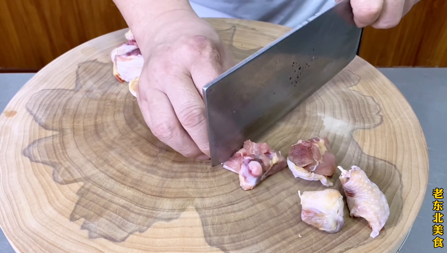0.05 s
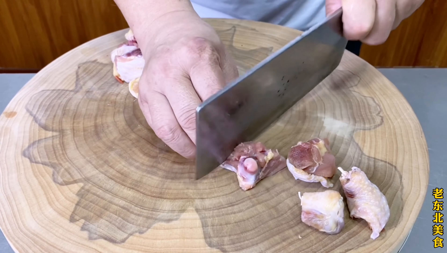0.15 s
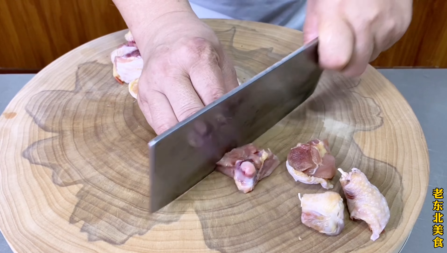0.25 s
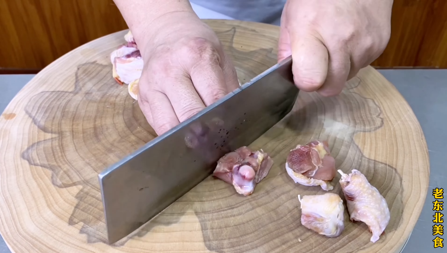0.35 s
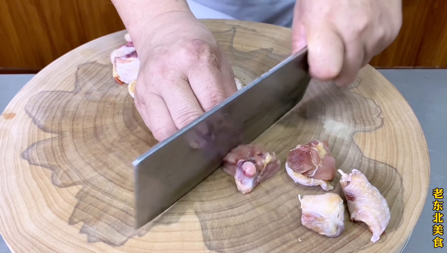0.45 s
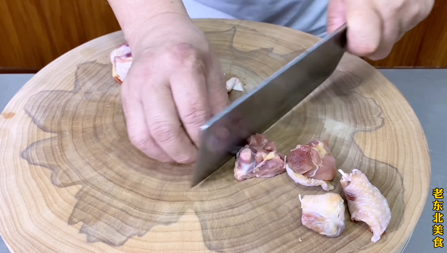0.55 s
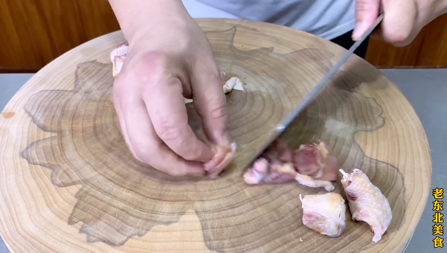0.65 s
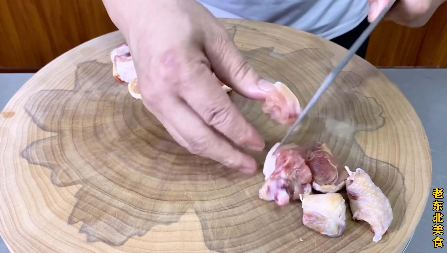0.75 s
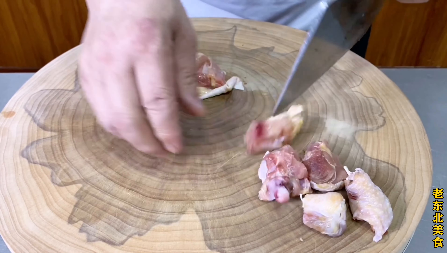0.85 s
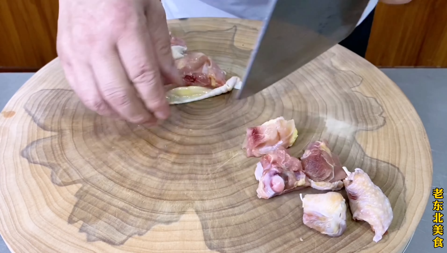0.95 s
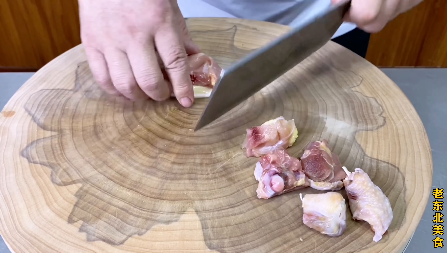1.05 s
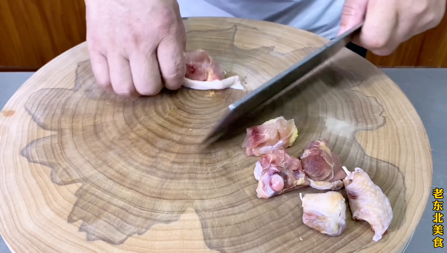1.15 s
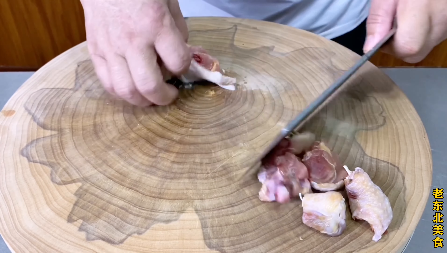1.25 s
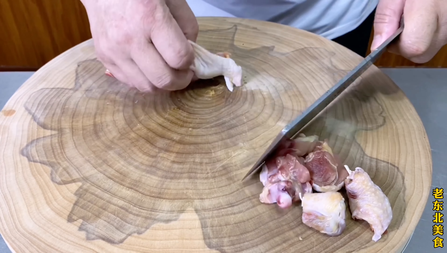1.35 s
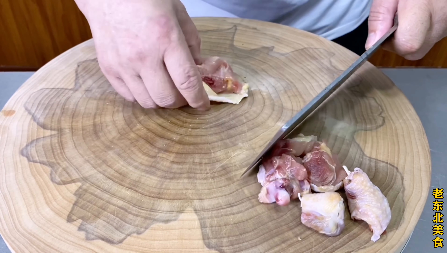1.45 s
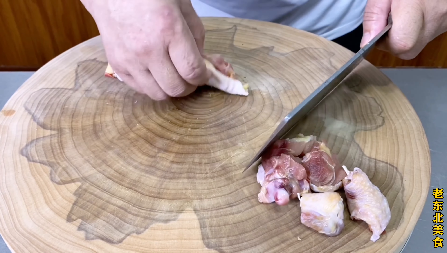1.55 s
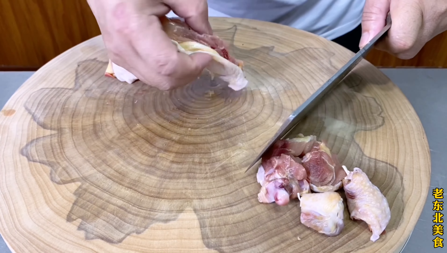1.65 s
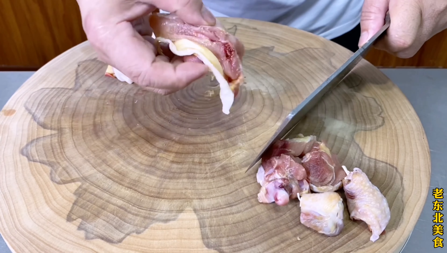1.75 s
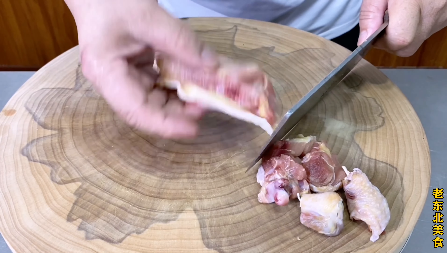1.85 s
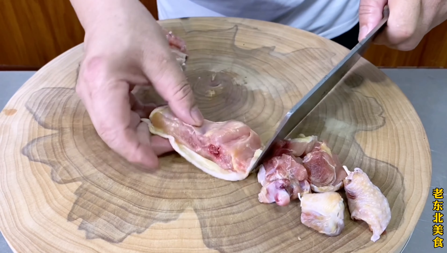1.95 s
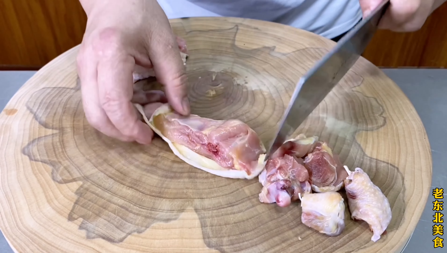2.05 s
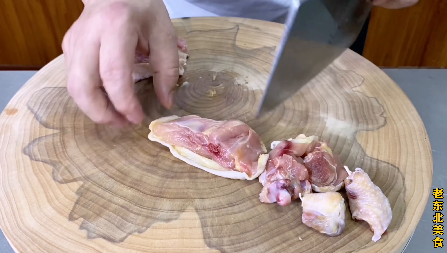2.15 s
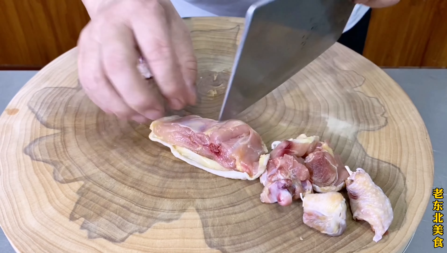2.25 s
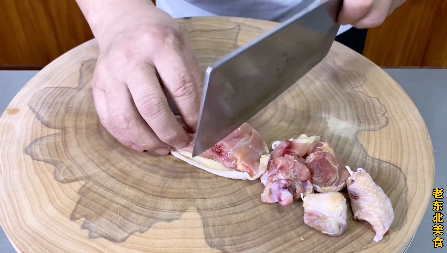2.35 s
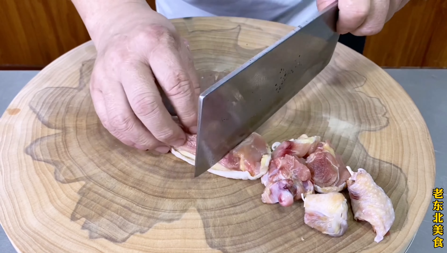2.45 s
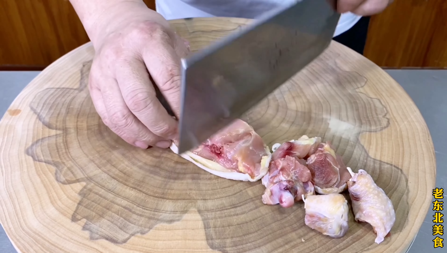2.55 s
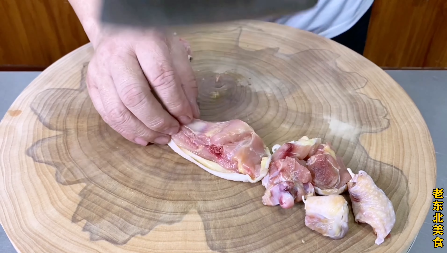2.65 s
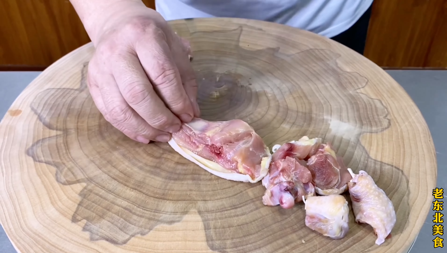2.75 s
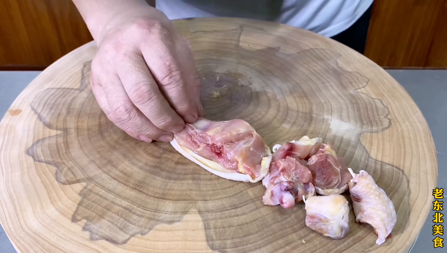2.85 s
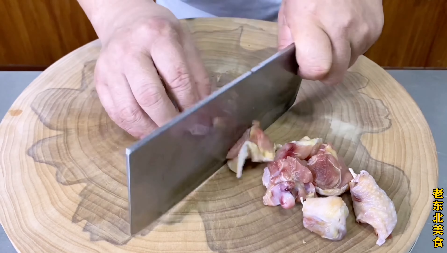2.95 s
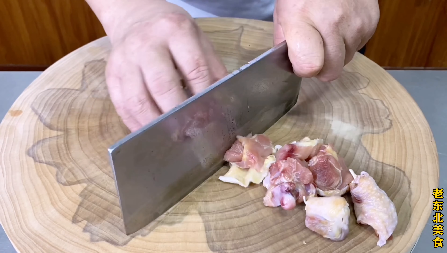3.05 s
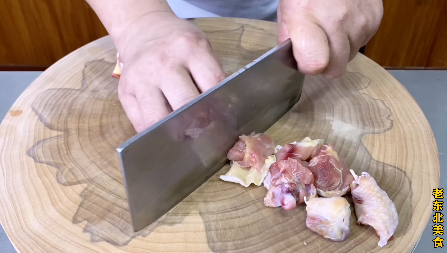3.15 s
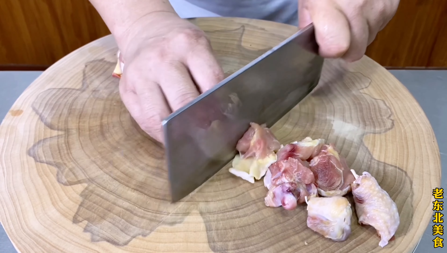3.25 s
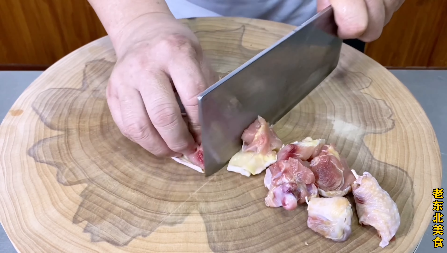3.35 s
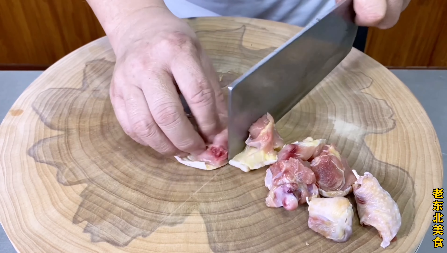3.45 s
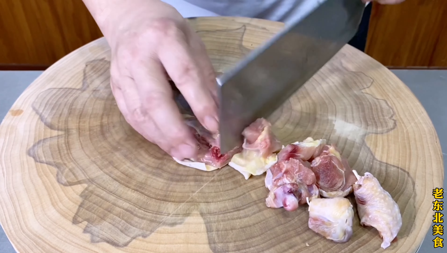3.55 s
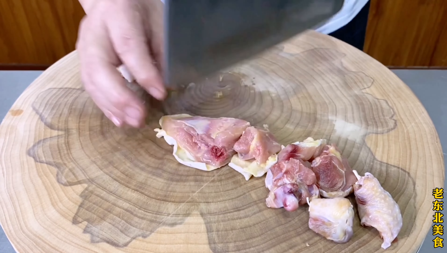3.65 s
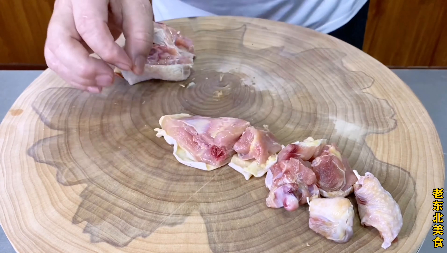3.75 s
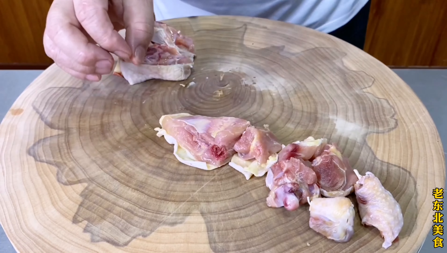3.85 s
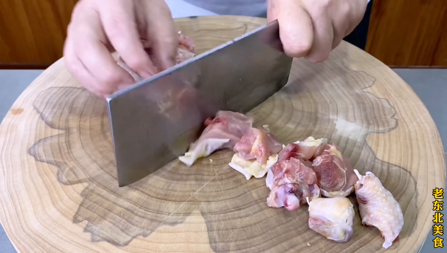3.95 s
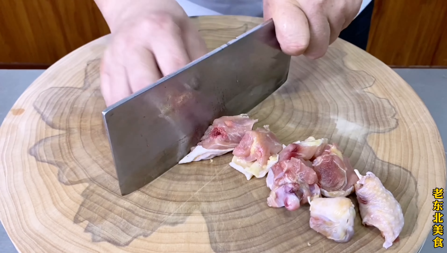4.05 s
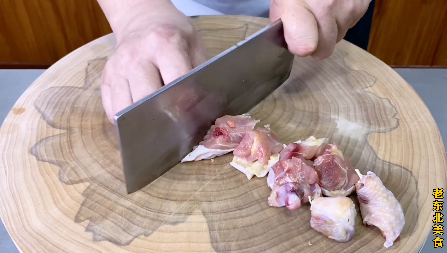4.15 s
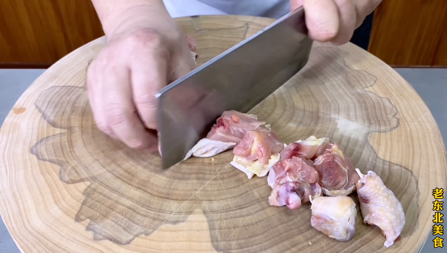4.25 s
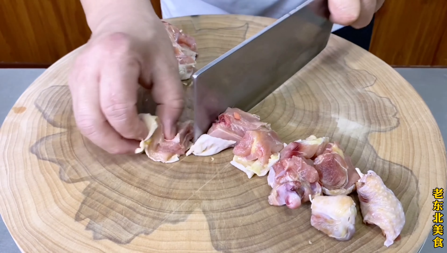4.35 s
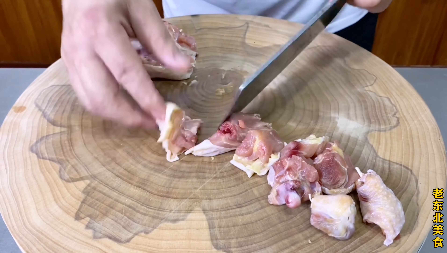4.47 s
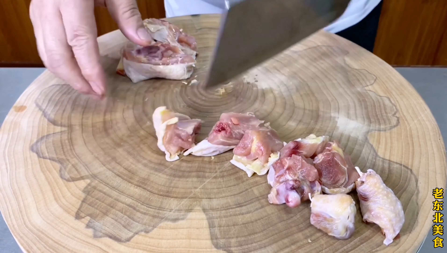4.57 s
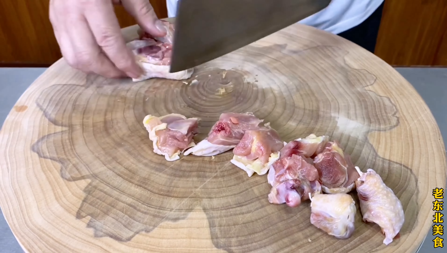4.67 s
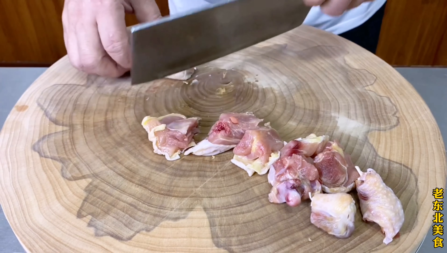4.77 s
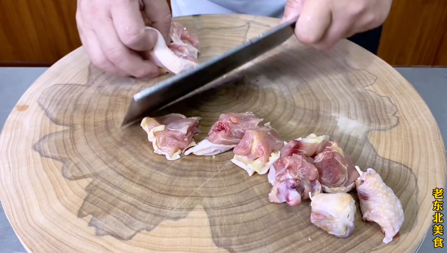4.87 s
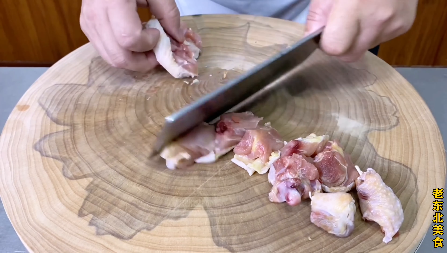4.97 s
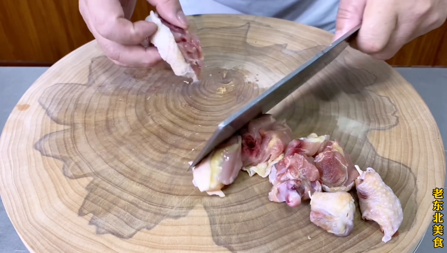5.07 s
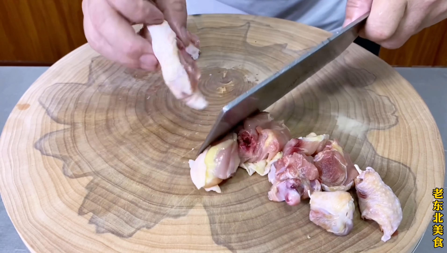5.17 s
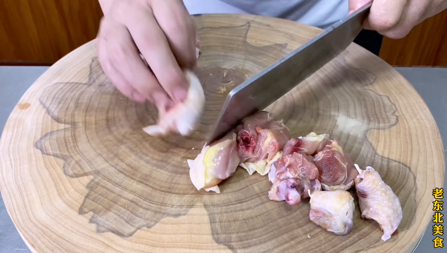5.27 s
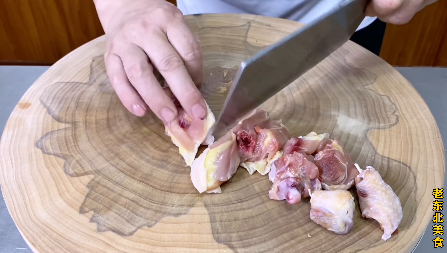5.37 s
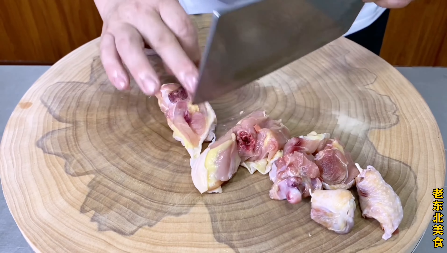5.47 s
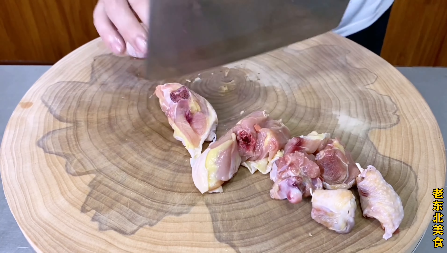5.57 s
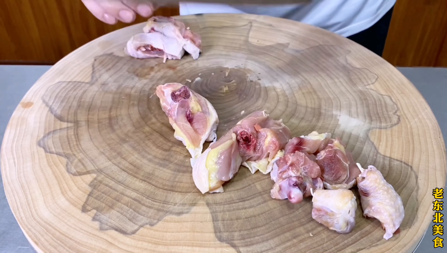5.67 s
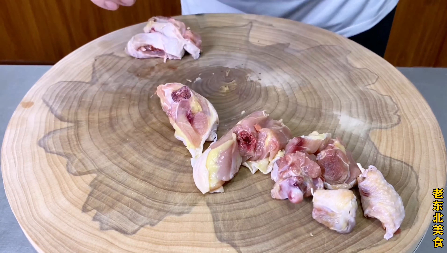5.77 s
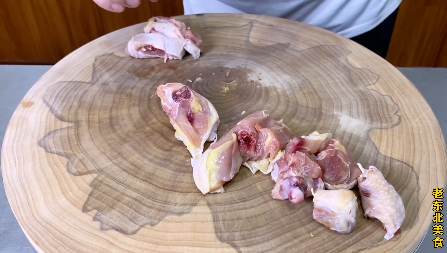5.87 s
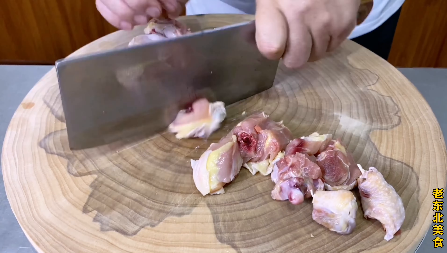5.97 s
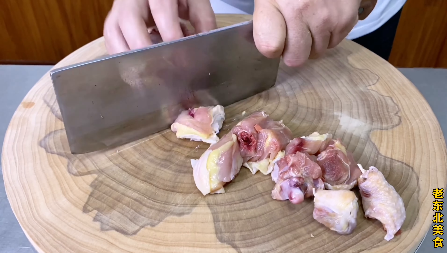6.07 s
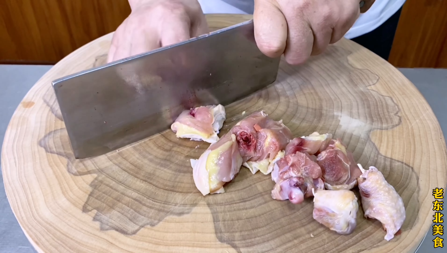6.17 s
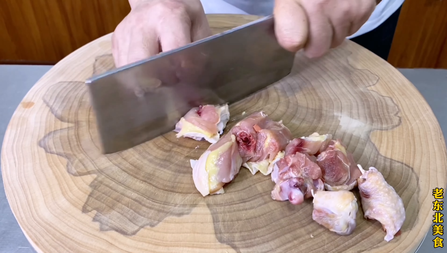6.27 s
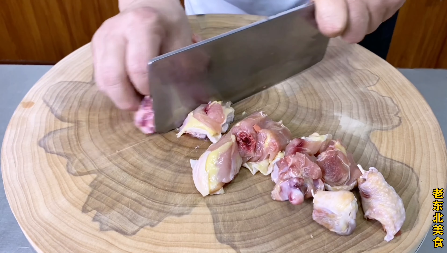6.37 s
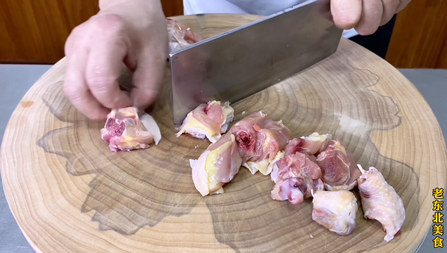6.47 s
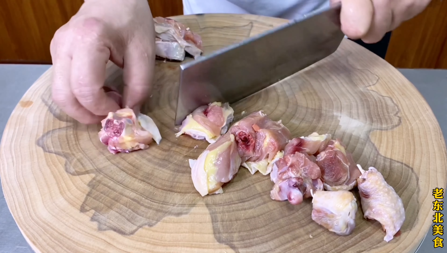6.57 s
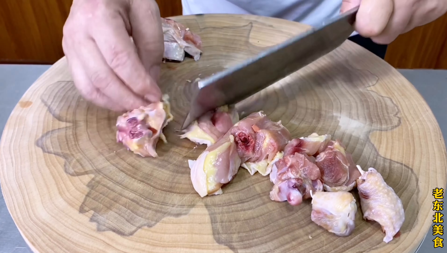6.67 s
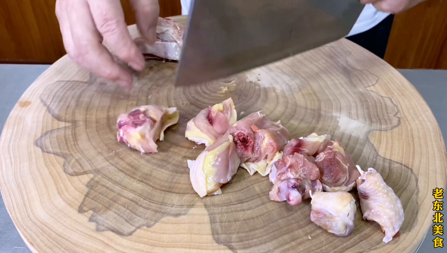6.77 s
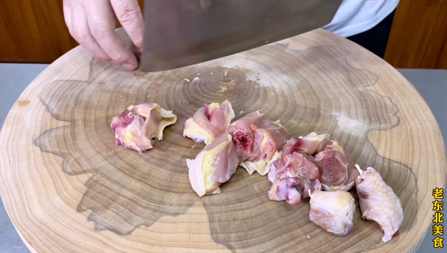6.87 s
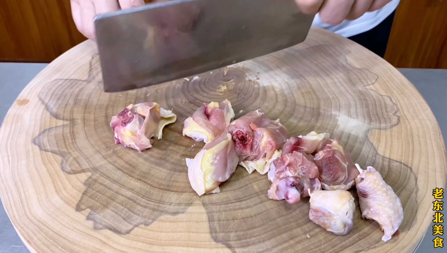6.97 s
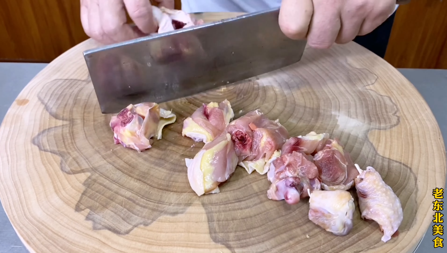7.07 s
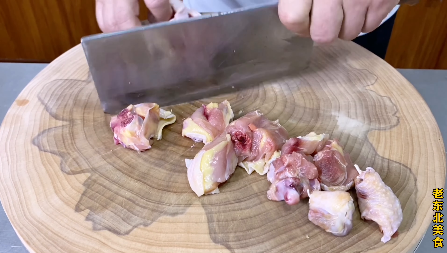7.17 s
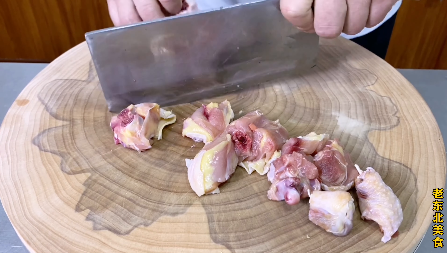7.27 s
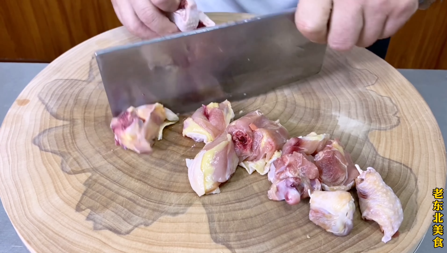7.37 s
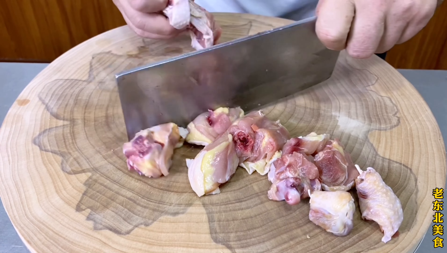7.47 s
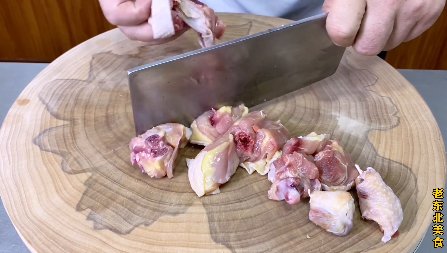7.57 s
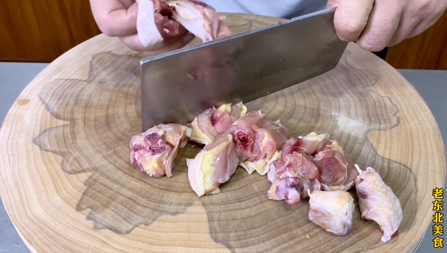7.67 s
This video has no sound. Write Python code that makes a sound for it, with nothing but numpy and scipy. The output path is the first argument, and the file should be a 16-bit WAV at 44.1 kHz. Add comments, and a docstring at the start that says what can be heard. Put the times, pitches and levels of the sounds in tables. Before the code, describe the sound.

Close stereo phone pickup in a hard-walled kitchen, with faint, deep fan air and hum throughout. In the first 0.8 s the cleaver edge scrapes wood and wet meat, with a dull knock near 0.4 and small steel squeaks. At 1.2 a light chop clacks and the blade sings briefly. Soft ticks, moist smacks and barely audible thin whistles follow, with a short scrape at 2.0. At 3.0 a very loud blow cracks bone and thuds into the block, followed by gritty dragging around 3.3. Another heavy, crunchier chop lands at 4.0, with smacks just after. Around 5.0 a weak knock leads into a bright, squeaky steel scrape, with a small tick at 5.4. The third hard crack comes at 6.1, ringing off the walls. A raspy scrape follows at 6.7, a light tap at 7.15, then squeaky drags until about 7.5.

```python
"""A heavy cleaver chops chicken on a thick wooden block, heard close by a phone with two microphone ports.
Each blow is a click and a burst of noise that cracks through bone, rings the block's damped modes and thuds.
Between blows the blade scrapes the wood as uneven noise, part of it ringing the steel, and squeaks in short tones;
small smacks and ticks are noise bursts, and wet meat pops in short damped tones.
A hard-walled kitchen echoes it with decaying noise over a fan's air noise and hum; thin whistles come and go."""
import sys
import numpy as np
from scipy import signal
from scipy.fft import rfft, irfft, next_fast_len
from scipy.io import wavfile
from scipy.ndimage import uniform_filter1d

SR = 44100
rng = np.random.default_rng(int(sys.argv[2]) if len(sys.argv) > 2 else 0)


def put_to_file(sound):
    """Save the sound as 16-bit audio at rate SR, in the file named by the first command-line argument."""
    columns = np.atleast_2d(sound).T  # one column per channel
    safe = np.clip(columns, -1, 1)
    whole_steps = np.round(safe * 32767)
    wavfile.write(sys.argv[1], SR, whole_steps.astype(np.int16))


N = 340452  # length of the scene in samples

# short modes of the wooden block, fed by crack and splinters: (pitch_hz, level_db, t60_s)
BLOCK_MODES = [(338, -17, 0.017), (640, -13, 0.017), (753, -3.5, 0.027), (946, 0.5, 0.011),
               (1100, -6, 0.013), (1430, 6.5, 0.012), (2110, -9.5, 0.034), (2540, -0.5, 0.008),
               (3900, -13, 0.0055)]
# colour of the bare crack: (frequency_hz, level_db)
SNAP_CURVE = [(250, -10), (380, -28), (700, 0), (1400, 9), (2500, 2.5), (3500, -3.5), (4800, -7),
              (6500, -9.5), (9000, -16), (15000, -22.5)]


def undb(db):
    """Gain of a dB value."""
    return 10 ** (np.asarray(db) / 20)


def unit(x):
    """Scale to rms 1."""
    return x / np.sqrt(np.mean(x ** 2))


def ring(x, hz, t60):
    """One mode: a two-pole resonator turns each impulse into a damped sine."""
    pole = np.exp(2j * np.pi * hz / SR - np.log(1000) / (max(t60, .002) * SR))
    return signal.lfilter([0, pole.imag], [1, -2 * pole.real, abs(pole) ** 2], x)


def modes(x, table, length=1.0, tilt_db=0.0, shift=0.0):
    """A body as a sum of modes; each call may shift them at random, damp them or tilt them per octave."""
    out = 0
    for hz, db, t60 in table:
        pitch_hz = hz * (1 + shift * rng.standard_normal())
        out = out + undb(db + tilt_db * np.log2(hz / 1000)) * ring(x, pitch_hz, length * t60)
    return out


def colour(x, db_at):
    """Weigh the spectrum by a function Hz -> dB, leaving the phase alone."""
    n = next_fast_len(x.shape[-1])
    hz = np.arange(1, n // 2 + 2) * SR / n
    return irfft(rfft(x, n) * undb(db_at(hz)), n)[..., :x.shape[-1]]


def ports(x, pan_db):
    """The two ports hear one sound a moment apart; the phone's body shades all but the bass."""
    port_lag_ms = -.17  # the left port is nearer the block
    n = next_fast_len(x.shape[-1])
    hz = np.arange(n // 2 + 1) * SR / n
    shade = undb(pan_db / 2 / (1 + (300 / (hz + 1)) ** 2))
    left = np.exp(-1j * np.pi * hz * port_lag_ms / 1000) * shade
    return irfft(rfft(x, n) * np.array([left, 1 / left]), n)[:, :x.shape[-1]]


def wide_noise(n):
    """Noise that is alike left and right in the bass and unrelated in the treble."""
    alike_hz = 566  # the side signal fades below this
    mid, side = rng.standard_normal((2, n))
    side = colour(side, lambda hz: -10 * np.log10(1 + (alike_hz / hz) ** 2))
    return np.array([mid + side, mid - side]) / np.sqrt(2)


def walk(rate):
    """Wandering control signal: random levels held 1 / rate s and slewed twice."""
    k = int(SR / rate)
    steps = np.repeat(rng.standard_normal(N // k + 1), k)
    return 1.45 * uniform_filter1d(uniform_filter1d(steps, k), k)[:N]


def add(out, s, x):
    """Mix x into out from second s on."""
    i = max(int(s * SR), 0)
    out[:, i:i + x.shape[1]] += x[:, :N - i]


def fan():
    """Fan: deep, steady air noise, with two wavering tones made of narrow resonant noise."""
    # air noise spectrum: (frequency_hz, level_db per Hz)
    air_curve = [(15, -68), (25, 0.5), (49, -9.5), (70, -12), (87, -6), (108, -2), (134, -11), (212, -11.5),
                 (301, -19.5), (1290, -32), (2110, -38), (2910, -39.5), (7110, -52.5), (10400, -69),
                 (16000, -56.5)]
    # wavering tones: (pitch_hz, width_hz, level_db)
    hum_tones = [(107.2, 2.4, -44.5), (208.6, 31, -47.5)]
    air_db, pan_db = -41.2, -1.5
    knots_hz, curve_db = np.transpose(air_curve)
    air = colour(wide_noise(N), lambda hz: np.interp(np.log(hz), np.log(knots_hz), curve_db))
    out = unit(air) * undb(air_db + 0.095 * walk(1.2))
    for hz, width_hz, db in hum_tones:
        t60 = np.log(1000) / np.pi / width_hz
        out = out + undb(db) * unit(ring(wide_noise(N), hz, t60))
    return out * undb(np.array([[pan_db], [-pan_db]]) / 2)


def whistles():
    """Faint thin tones: noise through a narrow resonance wavers under a soft swell."""
    # (start_s, end_s, pitch_hz, level_db before the swell)
    whistle_times = [(1.487, 1.772, 6190, -64), (1.624, 1.977, 1614, -59.5), (1.689, 1.753, 1060, -49)]
    out = np.zeros((2, N))
    for start, end, hz, db in whistle_times:
        t = np.arange(int((end - start) * SR)) / SR
        tone = unit(ring(rng.standard_normal((2, len(t))), hz, 0.27))
        add(out, start, undb(db) * tone * np.sin(np.pi * t / t[-1]))
    return out


def kitchen(dry):
    """Hard walls: dense, lumpy echoes as noise that dies away band by band, after a short gap."""
    # (centre_hz, t60_s, level_db)
    echo_bands = [(60.4, 1.8, -14.5), (111, 0.75, -34), (175, 0.77, -4.5), (303, 0.68, -4.5),
                  (488, 0.96, 1), (900, 0.22, -9.5), (2030, 0.72, -15.5), (4150, 0.45, -9.5),
                  (7340, 0.66, -26.5), (14600, 0.32, -13.5)]
    gap_s, rise_s = 0.0043, 0.0025
    t = np.arange(int(1.2 * SR)) / SR
    noise, tail = wide_noise(len(t)), 0
    for centre_hz, t60, db in echo_bands:
        band = colour(noise, lambda hz: -12 * np.log2(hz / centre_hz) ** 2)
        lumps_db = 2.8 * walk(45.4)[:len(t)]
        # longer bands are scaled down to balance their energy
        tail = tail + band * undb(db + lumps_db - 60 * t / t60) / np.sqrt(t60 * SR / 14)
    tail = tail * np.clip((t - gap_s) / rise_s, 0, 1)
    return signal.fftconvolve(dry, tail)[:, :N]


def ticks():
    """Each small smack, knock or tick is a short burst of noise, broad around its own centre."""
    # small smacks, knocks and ticks, some of them part of a blow or its rebound:
    # (time_s, level_db before colouring, centre_hz, left_minus_right_db)
    small_hits = [(0.05, -57, 3830, -10), (0.393, -28, 7750, 9), (.398, -31, 3800, -2),
                  (.404, -26, 6700, -4), (0.43, -33, 2500, -8), (.434, -16, 900, 0), (0.727, -38, 6000, 0),
                  (0.961, -41, 3290, 4), (1.178, -24, 4500, -5), (1.631, -40.5, 6500, 2),
                  (1.67, -33, 2380, -2), (1.968, -48, 5200, 0), (2.005, -45, 7000, -4),
                  (2.011, -29, 3940, 2), (2.111, -39, 2700, 1), (2.455, -53, 4600, 0),
                  (2.4975, -43, 2220, 1), (2.512, -48, 6100, 4), (2.57, -40.5, 2450, 3),
                  (2.85, -36, 3510, 6), (3.075, -27, 4500, 2), (3.141, -27, 2330, -2),
                  (3.301, -30, 8000, 6), (3.497, -41, 5500, 7), (3.608, -45, 7800, 0),
                  (4.112, -20, 2500, -1), (4.179, -23.5, 2110, 3), (4.217, -29, 2030, -11),
                  (5.133, -35, 4190, -3), (5.165, -34.5, 4150, 3), (5.179, -46, 4100, -4),
                  (5.411, -32.5, 5100, 4), (6.153, -24, 2540, -8), (6.359, -41, 3860, 9),
                  (6.73, -27, 2000, -1), (7.089, -24, 4000, 7), (7.151, -32, 4800, 3),
                  (7.272, -26, 2500, 2)]
    rise_ms, fade_ms = 0.3, 3.4  # time constants
    out, t = np.zeros((2, N)), np.arange(SR // 20) / SR
    for s, db, centre_hz, pan_db in small_hits:
        slope_s = np.where(t < .002, rise_ms / 1000, fade_ms / 1000)
        burst = rng.standard_normal(len(t)) * np.exp(-np.abs(t - .002) / slope_s)
        burst = colour(burst, lambda hz: -7.0 * np.abs(np.log2(hz / centre_hz)))
        add(out, s - .002, ports(undb(db) * burst, pan_db))
    return out


def rasps():
    """The edge judders over bone and grain: gritty noise in one broad resonance, quick start, uneven fade."""
    # (start_s, length_ms as the fade's time scale, level_db before the fade, centre_hz, width_hz)
    judders = [(2.016, 27, -46, 2700, 300), (3.245, 160, -46, 5350, 800), (5.015, 40, -30, 4200, 400),
               (6.726, 44, -44, 2100, 303), (6.727, 82, -41, 3300, 249), (6.729, 99, -37.5, 4400, 600),
               (6.733, 97, -42.5, 6530, 453), (6.73, 90, -46, 5430, 500), (7.081, 60, -38.5, 3850, 1100)]
    out = np.zeros((2, N))
    for s, ms, db, hz, width_hz in judders:
        u = np.linspace(0, 2, int(2 * ms / 1000 * SR))  # time in lengths
        grit = rng.standard_normal((2, len(u))) * undb(2.1 * walk(150)[:len(u)])
        # a shared part and a part of each port's own
        band = unit(colour(grit[0] + 1.8 * grit, lambda f: -12 * ((f - hz) / width_hz) ** 2))
        envelope = np.minimum(u / 0.076, 1) * np.exp(-1.6 * u ** 2)
        add(out, s, ports(undb(db) * band * envelope, -0.5))
    return out


def squeaks():
    """The edge catches and the blade sings: short tones swell fast and die; the higher, the rougher."""
    # pressure on the edge shifts the pitch of the mode that sings
    # (start_s, length_ms as the swell's time scale, level_db before the swell, pitch_hz)
    catches = [(.04, 19, -38, 1430), (.365, 18, -39, 5540), (.368, 16, -43, 4230), (0.409, 13, -23.5, 1430),
               (0.505, 17, -31, 1430), (.511, 38, -34, 4585), (.54, 54, -39, 6040), (.575, 65, -34.5, 7920),
               (.648, 18, -39, 6000), (.655, 36, -38, 1990), (.67, 50, -42, 4670), (0.714, 54, -38, 4190),
               (0.716, 33, -31, 1430), (.722, 22, -20.5, 2700), (.762, 35, -39, 3830),
               (.77, 46, -49.5, 5850), (1.232, 65, -25, 3830), (1.233, 48, -31, 5850),
               (1.234, 48, -29, 6700), (1.242, 13, -17, 1430), (1.255, 30, -28, 4290),
               (1.27, 63, -32.5, 4745), (1.258, 68, -25, 1990), (2.01, 3.5, -15, 4060),
               (2.02, 33, -45, 4190), (3.005, 45, -28, 5200), (3.44, 50, -36.5, 2150),
               (4.957, 54, -14.5, 1990), (4.958, 58, -23, 1430), (4.97, 40, -36, 3290),
               (4.965, 75, -30, 3830), (5.002, 23, -15, 3650), (5.001, 23, -26, 7200),
               (5.005, 12, -23, 5220), (5.004, 56, -32, 6370), (5.01, 40, -19, 4190),
               (5.024, 21, -18, 1430), (5.031, 48, -27, 2666), (5.031, 35, -20, 3300),
               (5.051, 23, -23, 1990), (6.738, 28, -25, 4300), (6.733, 20, -30, 3250),
               (7.266, 41, -23.5, 3830), (7.271, 30, -25.5, 1430), (7.275, 54, -28, 1990),
               (7.415, 45, -35.5, 1430), (7.428, 39, -32, 3830), (7.456, 28, -27, 3830),
               (7.452, 35, -18, 1430), (7.496, 18, -29, 1400), (7.51, 43, -31.5, 1350),
               (7.506, 29, -34, 3780), (7.47, 60, -41, 4250), (7.46, 29, -32, 1990), (7.472, 20, -20, 2700)]
    rough_hz = 8600  # a mode this high is half tone, half rasp
    out = np.zeros((2, N))
    for s, ms, db, hz in catches:
        u = np.linspace(0, 1.5, int(1.5 * ms / 1000 * SR))  # time in lengths
        tone = np.sqrt(2) * np.sin(2 * np.pi * (hz * u * ms / 1000 + rng.random()))
        rough = unit(ring(rng.standard_normal(len(u)), hz, 120 / hz))
        swell = u * np.exp(-2.8 * u ** 2)
        add(out, s, ports(undb(db) * (tone + hz / rough_hz * rough) * swell, -0.85))
    return out


def drags():
    """Pressure of the edge as swell, hold and fade; where drags overlap the stronger one sets the colour."""
    # one drag over wood and meat; swell and fade are the times for 20 dB:
    # (loudest_s, rub_db, swell_ms, hold_ms, fade_ms, blade_share_db, tilt_db per octave)
    strokes = [(.055, -53.5, 37, 4.7, 22, -7, -5), (.34, -52.5, 270, 23, 74, 1, 5.5),
               (.385, -39, 44, 17, 160, -4, -3.5), (.518, -39.5, 34, 13, 220, -4.5, 2.5),
               (.6, -49, 100, 78, 64, -15, 4), (0.725, -40, 74, 13, 42, 0.5, 0),
               (1.238, -33, 15, 41, 33, 0, 0.5), (1.311, -49, 35, 5, 130, -23, 3.5),
               (1.54, -62, 40, 160, 97, -19, -1), (2.009, -43, 16, 2.8, 47, -9, -2.5),
               (3.328, -42.5, 320, 4.2, 180, -3.5, 3.5), (3.4, -52, 87, 96, 135, 4, 5),
               (4.328, -47, 440, 73, 210, -1, 5), (5.018, -32, 53, 7, 48, 0, 2),
               (5.09, -56.5, 40, 30, 170, -9, 5.5), (5.413, -48, 16, 4.5, 44, 2, 1),
               (5.55, -55.5, 150, 71, 230, -9, -5), (6.432, -41, 270, 43, 102, -0.5, 2.5),
               (6.732, -33.5, 11, 6.9, 110, -8, 0), (7.086, -42.5, 19, 61, 82, -7, 3.5),
               (7.274, -42, 55, 10, 180, -6, -3), (7.466, -41, 68, 62, 45, -1, 1.5)]
    t = np.arange(N) / SR
    power, share_db, tilt_db = np.full((3, N), 1e-18)
    for s, db, swell_ms, hold_ms, fade_ms, own_share_db, own_tilt_db in strokes:
        ms = 1000 * (t - s)
        slopes = np.maximum(-ms / swell_ms, np.maximum(ms - hold_ms, 0) / fade_ms)
        own = undb(2 * (db - 20 * slopes))  # doubled dB gives power
        power = power + own
        share_db = share_db + own * own_share_db
        tilt_db = tilt_db + own * own_tilt_db
    return np.sqrt(power), share_db / power, tilt_db / power


def wet(gain):
    """Pockets of juice pop under the edge, each a short damped sine on a fixed pitch of its own."""
    pops_per_s, low_hz, high_hz = 770, 1300, 7570
    faintest_db, spread_db = -10.5, 12  # against the rub; from the faintest pop to the loudest
    out, k = np.zeros((2, N + 1024)), np.arange(1024)
    when, pitch, size, length, side = rng.random((7000, 5))[:int(pops_per_s * N / SR)].T
    at = (when * N).astype(int)
    hz = low_hz * (high_hz / low_hz) ** pitch
    cycles = hz[:, None] * k / SR
    fade_cycles = 17.3 * (0.18 + length[:, None]) / 3  # time constant
    pops = np.sin(2 * np.pi * cycles) * np.exp(-cycles / fade_cycles) * (1 - k / 1024)
    pops = pops * (gain[at] * undb(faintest_db + spread_db * size ** 2))[:, None]
    for ear, share in zip(out, (np.cos(side * np.pi / 2), np.sin(side * np.pi / 2))):
        np.add.at(ear, at[:, None] + k, pops * (0.14 + share[:, None]))
    return out[:, :N]


def scrapes():
    """Uneven stick and slip: a gritty rub, part of it ringing the blade's modes, each mode fed on and off."""
    # colour of the rub: (centre_hz, level_db)
    rub_bands = [(1000, -1), (1500, -25), (2200, -2.5), (3100, -2.5), (4300, -3.5), (5800, -7.5),
                 (7600, -9), (10500, -8), (14000, -15)]
    # modes of the blade: (pitch_hz, width_hz, level_db relative to each other)
    blade_modes = [(1430, 80, 7.5), (1990, 30, -0.5), (2700, 30, -9), (3290, 23, -5), (3670, 88, -20),
                   (3830, 11, -26), (4190, 38, -11), (4585, 120, 6), (5220, 90, -13), (6400, 19, -18),
                   (5850, 50, -20), (7270, 60, -0.5), (7700, 89, 5.5), (7920, 97, 0)]
    gain, share_db, tilt_db = drags()
    grit = gain * unit(undb(1.26 * walk(60) + 1.8 * walk(500)))
    rub = grit * rng.standard_normal(N)
    # the edge is long, so each port also hears a part of its own
    own = colour(rng.standard_normal((2, N)), lambda hz: -10 * np.log10(1 + (hz / 6500) ** 4))
    wide = ports(rub, -0.35) + 1.14 * grit * own
    hiss = 0
    # wet meat and wood grain: narrow parts of the rub flare up one by one
    for centre_hz, db in rub_bands:
        flicker = undb(db + tilt_db * np.log2(centre_hz / 4500) + 4.0 * walk(45))
        hiss = hiss + flicker * colour(wide, lambda hz: -50 * np.log2(hz / centre_hz) ** 2)
    steel = 0
    for hz, width_hz, db in blade_modes:
        fed = rub * undb(share_db + 3.3 * walk(40))
        steel = steel + undb(db - 32) * ring(fed, hz, np.log(1000) / np.pi / width_hz)
    return hiss + ports(steel, -1.2) + wet(gain)


def snap_db_at(hz):
    """Level of the bare crack at each frequency, in dB."""
    knots_hz, db = np.transpose(SNAP_CURVE)
    return np.interp(np.log(hz), np.log(knots_hz), db)


def bone_crack(t, ms, tilt_db):
    """A burst of noise: a brief treble-only rise, a sharp click 10 ms in, then a fast fade."""
    rise_hz = 2500  # the rise before the click lies above this
    x = (t - .01) / (ms / 1000)
    shared, own = rng.standard_normal(len(t)), wide_noise(len(t))
    # each port hears the long cut from its own side
    burst = (0.18 * shared + 0.42 * own) * np.exp(np.where(x < 0, 2.0 * x, -1.3 * x))
    rise = colour(burst * (x < 0), lambda hz: -10 * np.log10(1 + (rise_hz / hz) ** 4))
    crack = burst * (x >= 0) + 1.37 * rise
    crack[:, int(.01 * SR)] += 3.5  # the click
    return colour(crack, lambda hz: tilt_db * np.log2(hz / 1500))


def bone_splinters(since):
    """Splinters of bone and fibre keep snapping after the click: sparse random impulses that fade."""
    fade_ms, per_s = 30.6, 1100  # time constant; average count in each port
    shape = (2, len(since))
    snaps = (rng.random(shape) < per_s / SR) * rng.standard_normal(shape)
    return snaps * (since > 0) * np.exp(-1000 * since / fade_ms)


def crunch_of(splinters, mode_shift):
    """Splinters heard directly, broad around 1 kHz, and knocking on the block's modes."""
    bare = colour(splinters[0] + 0.58 * splinters, lambda hz: -3.5 * np.log2(hz / 1000) ** 2)
    knock = modes(splinters[0] + 0.29 * splinters, BLOCK_MODES, length=1.66, shift=mode_shift)
    return 12.0 * bare + 0.56 * knock


def table_boom(since, rock_ms):
    """The block rocks on the table: fading noise rolls on in the table's low modes."""
    # (pitch_hz, level_db, t60_s)
    table_modes = [(59.9, -2.5, 0.45), (86.6, -10, 0.11), (111.8, -5, 0.52), (137, -9, 0.45),
                   (190.5, -20, 0.14), (252.5, -5, 0.14), (374, -9.5, 0.14), (468, -19.5, 0.14)]
    rocking = rng.standard_normal(len(since)) * (since > 0) * np.exp(-1000 * since / rock_ms) / 30
    return modes(rocking, table_modes)


def block_thud(t):
    """The blade's weight lands: a smooth 1.9 ms push sets off the low modes of block and table."""
    # (pitch_hz, level_db, t60_s)
    low_modes = [(69, 1, 0.049), (106.6, -2.5, 0.15), (161, -3.5, 0.068), (232, -4.5, 0.023)]
    push = np.sin(np.pi * np.clip((t - .008) / 0.0019, 0, 1)) ** 2
    return modes(push / push.sum(), low_modes)


def chops():
    """Bone cracks and the blade's weight lands; the block spreads the blow out, treble first, bass last."""
    # blade meets block; levels are relative, rock_ms is the time constant of the block rocking on the table,
    # free scales the after-ring's length: 1 = free, less where meat damps it
    # (time_s, crack_db, thud_db, crack_ms as time scale, brightness_db per octave, left_minus_right_db,
    # after_ring_db, after_ring_tilt_db per octave, walls_share_db, crunch_db, boom_db, rock_ms, free)
    blows = [(1.178, -19.5, -27.5, 2.9, -0.7, 0, -3.5, -0.5, -4.5, -30.5, -35, 30.2, 0.73),
             (2.992, -4, -7, 4.2, 1.1, -2.45, -17, -3.5, -3.5, -15.5, -21, 213, 1),
             (4.029, -5, -10.5, 4.7, 1, -0.5, -16, -3, -4.5, -11.5, -13.5, 73, 0.81),
             (4.956, -30, -32.5, 3.6, -2.5, 0.17, -17, 9, -15, -33.5, -24.5, 40, 0.66),
             (6.07, -2, -8.5, 3.8, 0.5, 2.05, -16, -2.5, -5, -17, -21, 143, 1),
             (7.152, -23.5, -25, 5, -0.5, 0.2, -9, -4, -7.5, -36, -43, 35.8, 0.55)]
    # longer modes of block and blade together: (pitch_hz, level_db, t60_s when free)
    long_modes = [(302.5, -17, 0.1), (380, -30, 0.12), (615, -34.5, 0.14), (705.6, -16.5, 0.19),
                  (772, -16, 0.21), (854, -14, 0.062), (1078, -29, 0.078), (1240, -26, 0.074),
                  (1400, -27, 0.076), (1698, -14, 0.084), (1973, -23.5, 0.14), (2186, -14, 0.095),
                  (2670, -31, 0.089)]
    mode_shift = .015  # each blow lands elsewhere and shifts the long modes by about this share
    bending_ms = 2.865  # bending waves cross the block slower in the bass: travel time at 1 kHz
    out, walls, n = np.zeros((2, N)), np.zeros((1, N)), 1 << 15
    t, f = np.arange(n) / SR, np.arange(n // 2 + 1) * SR / n
    since = np.maximum(t - .012, 0)
    spread = np.exp(-4j * np.pi * bending_ms / 1000 * np.sqrt(1000 * f))
    for (s, crack_db, thud_db, ms, tilt_db, pan_db, ring_db, ring_tilt_db,
         walls_db, crunch_db, boom_db, rock_ms, free) in blows:
        crack = bone_crack(t, ms, tilt_db)
        snap = 2.54 * colour(crack, snap_db_at)
        wood = 0.15 * modes(crack, BLOCK_MODES)
        splinters = bone_splinters(since)
        crunch = undb(crunch_db) * crunch_of(splinters, mode_shift)
        boom = undb(boom_db) * table_boom(since, rock_ms)
        # splinters keep the long modes going
        feed = 0.83 * crack + 1.35 * splinters[0]
        after = undb(ring_db) * modes(feed, long_modes, free, ring_tilt_db, mode_shift)
        thud = block_thud(t)
        blow = undb(crack_db + 1.5) * (wood + snap + after) + undb(thud_db + 7.5) * thud + crunch + boom
        add(out, s - .012, ports(irfft(rfft(blow) * spread), pan_db))
        # summed over all directions the noise evens out: the walls get the blow's smooth colour
        even = colour(1. * (t == 0), lambda hz: snap_db_at(hz) + tilt_db * np.log2(hz / 1500))
        to_walls = undb(crack_db + 34.0 + walls_db) * np.roll(even, int(.01 * SR))
        to_walls = to_walls + undb(crack_db - 13.5) * after[0] + undb(thud_db + 10.0) * thud
        add(walls, s - .012, irfft(rfft(to_walls) * spread)[None])
    return out, walls


def scene():
    """Chops, small hits, scrapes, rasps and squeaks with their echo, over whistles and the fan."""
    blows, blows_to_walls = chops()
    handling = ticks() + scrapes() + rasps()
    blade = squeaks()
    to_walls = blows_to_walls + handling[:1] + 0.4 * blade[:1]
    return blows + handling + blade + kitchen(to_walls) + whistles() + fan()


def record(dry):
    """The phone drops the deepest bass, turns down after loud blows, rounds the peaks and cuts the top."""
    rumble_hz, top_hz = 56.4, 15800
    # gain control: where it starts, its memory, dB taken per dB above
    start_db, memory_s, slope = -31.5, 0.079, 0.23
    thin = signal.sosfilt(signal.butter(3, rumble_hz, "high", fs=SR, output="sos"), dry)
    keep = np.exp(-1 / (memory_s * SR))
    power = signal.lfilter([1 - keep], [1, -keep], np.mean(thin ** 2, axis=0))
    heard_db = 10 * np.log10(power + 1e-12)
    held = thin * undb(-slope * np.maximum(heard_db - start_db, 0))
    rounded = np.tanh(0.88 * held) / 1.013
    return signal.sosfilt(signal.ellip(8, .2, 80, top_hz, fs=SR, output="sos"), rounded)


dry = scene()
out = record(dry)
put_to_file(out)
```